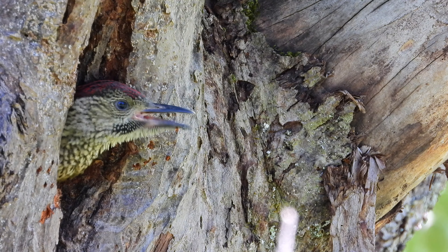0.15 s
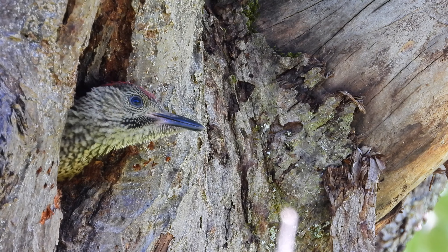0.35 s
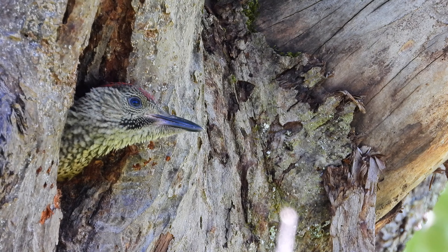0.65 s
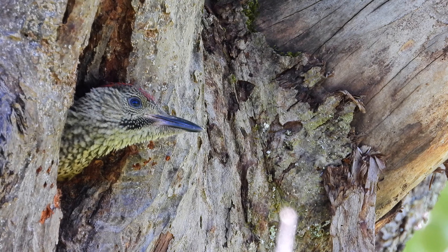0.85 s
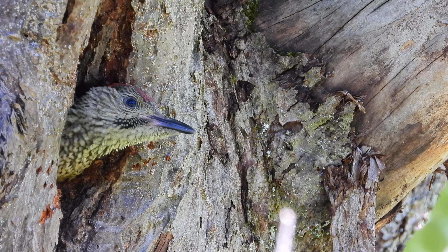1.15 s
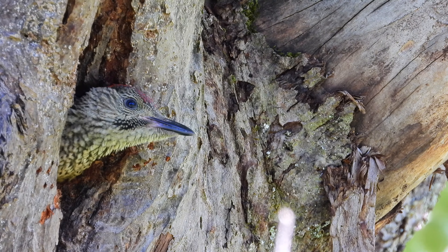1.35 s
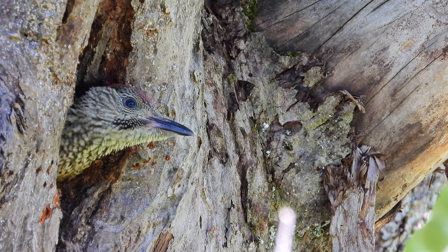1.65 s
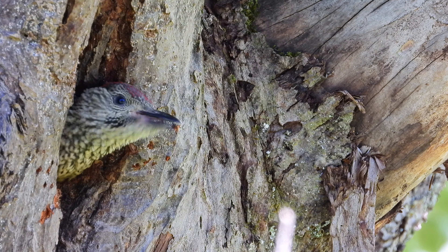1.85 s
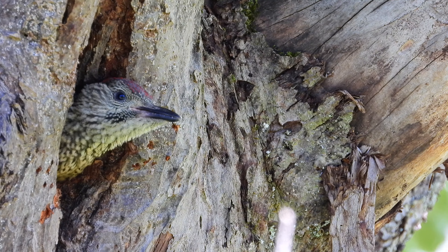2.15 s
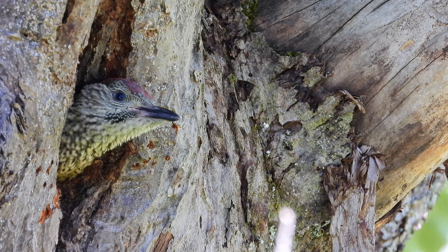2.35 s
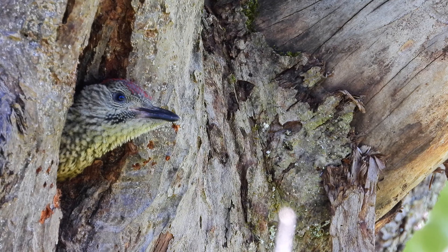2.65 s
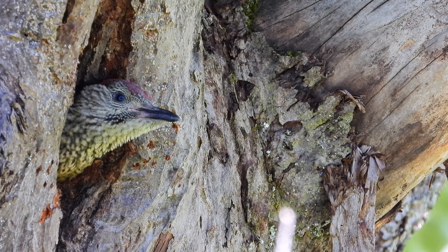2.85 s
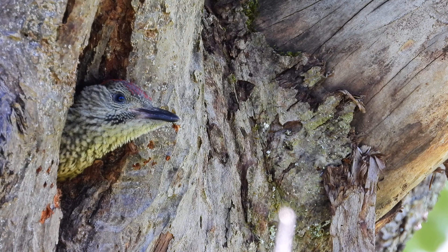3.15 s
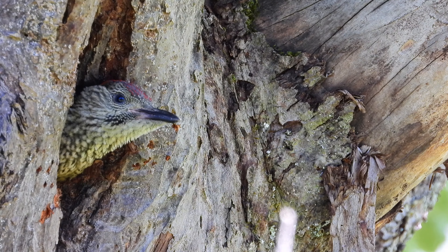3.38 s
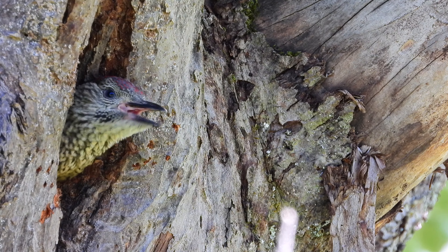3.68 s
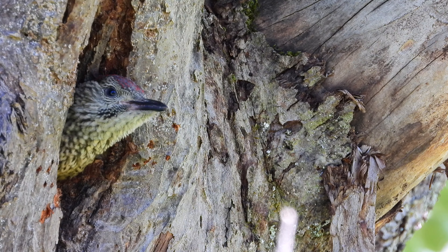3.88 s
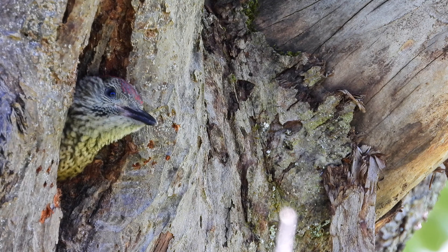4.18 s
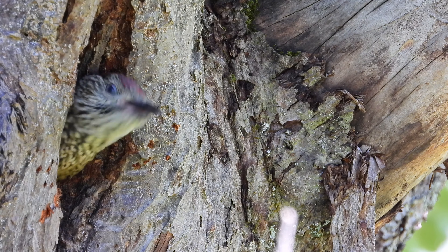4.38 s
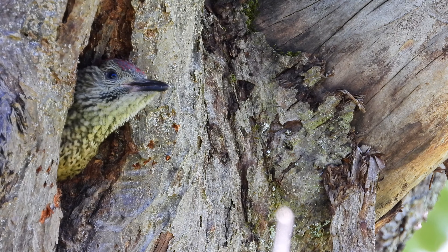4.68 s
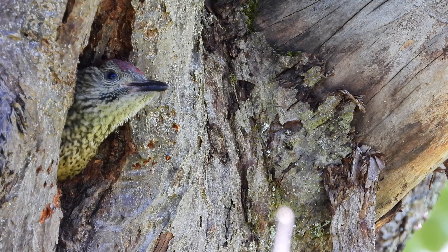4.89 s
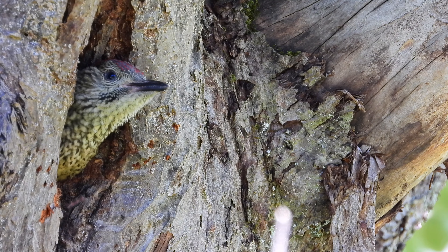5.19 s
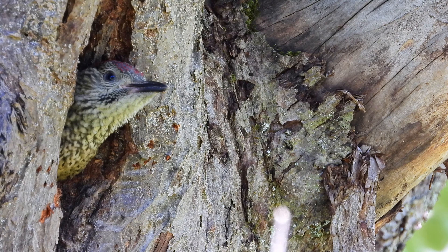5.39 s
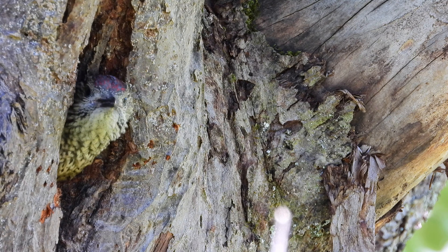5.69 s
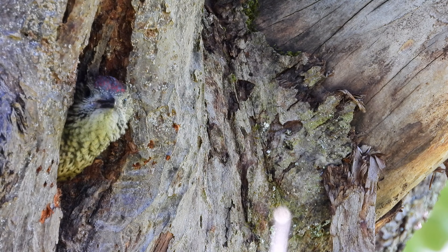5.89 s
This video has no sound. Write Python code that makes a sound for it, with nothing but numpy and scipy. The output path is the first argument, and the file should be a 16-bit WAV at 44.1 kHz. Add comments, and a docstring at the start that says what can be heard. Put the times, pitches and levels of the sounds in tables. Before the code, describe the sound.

A young woodpecker gives four short, sharp, falling calls close by, over faint distant chirps, a soft breeze and hiss.

```python
"""A young woodpecker begs from its nest hole near the microphone: four sharp calls. The membranes of its
syrinx catch roughly, whistle down in pitch and slacken into a rasp; the trunk throws each call back.
Claws scrape on the bark close by, and small birds chirp far off in a softly rushing wood.
The microphone feeds only the right channel, with the camera's faint flutter and hum; both channels hiss."""
import sys
import numpy as np
from scipy import signal
from scipy.fft import rfft, irfft, next_fast_len
from scipy.io import wavfile
from scipy.ndimage import uniform_filter1d, map_coordinates

SR = 44100
rng = np.random.default_rng(int(sys.argv[2]) if len(sys.argv) > 2 else 0)


def store_wav(level_fs):
    """Save 16-bit WAV to argv[1]."""
    pcm = np.round(np.clip(np.atleast_2d(level_fs), -1, 1) * 32767)
    wavfile.write(sys.argv[1], SR, pcm.T.astype(np.int16))


N = 265923


def amp(db):
    """Decibels to gain."""
    return 10 ** (np.asarray(db) / 20)


def unit(x):
    """Scale to rms 1."""
    return x / np.sqrt(np.mean(x ** 2) + 1e-20)


def ramp(t, length):
    """0 before time 0, rising evenly to 1 over length."""
    return np.clip(t / length, 0, 1)


def along(points, hz):
    """Read (Hz, value) points on a log axis."""
    freqs, values = np.transpose(points)
    return np.interp(np.log(hz + 1), np.log(freqs + 1), values)


def filtered(x, response):
    """Pass x through a complex frequency response."""
    size = x.shape[-1]
    padded = next_fast_len(size + 8192)
    return irfft(rfft(x, padded) * response(np.fft.rfftfreq(padded, 1 / SR)), padded)[..., :size]


def low_cut(x, edge_hz, order=4):
    """Roll off what lies below an edge."""
    return filtered(x, lambda hz: 1 - 1 / (1 + (hz / edge_hz) ** order))


def noise(spectrum, size):
    """Coloured noise of rms 1."""
    return unit(filtered(rng.standard_normal(size), lambda hz: amp(along(spectrum, hz))))


def wobble(rate, size):
    """A smooth random curve with rate knots a second."""
    return map_coordinates(rng.standard_normal(size // 8), [np.arange(size) * rate / SR], mode="wrap")


def add(track, start_s, sound):
    """Mix a sound into a track."""
    part = track[max(round(start_s * SR), 0):][:len(sound)]
    part += sound[:len(part)]


# The amplifier's noise floor. Each row: frequency in Hz, relative density in dB.
HISS_SPECTRUM = [(20, -18), (60, -12), (150, -5.5), (400, -2), (2000, -1), (8000, 0), (15000, -1)]


def amplifier_hiss(level_db=-57.5):
    """The steady hiss of one channel's amplifier."""
    return amp(level_db) * noise(HISS_SPECTRUM, N)


# Modes of the camera body. Each row: frequency in Hz, relative level in dB, t60 in seconds.
BODY_MODES = [(113, -12, 0.023), (174.7, 19.5, 0.078), (222, -2.5, 0.071)]
# The camera's hum. Each row: frequency in Hz, rms level in dB.
HUM_TONES = [(100, -72.5), (175.5, -73.5), (200, -75), (400, -79.5), (9890, -93)]


def camera(flutter_db=-64, taps_per_s=20.084, first_s=0.00501, spread_db=2):
    """Right at the microphone, a mechanism softly taps the camera body over a steady hum."""
    t = np.arange(N) / SR
    age = t[:SR // 8]
    tap = sum(amp(db - 60 * age / t60) * np.sin(2 * np.pi * hz * age) for hz, db, t60 in BODY_MODES)
    taps = np.zeros(N)
    for start in np.arange(first_s, N / SR, 1 / taps_per_s):
        add(taps, start, -amp(spread_db * rng.standard_normal()) * tap)
    hum = sum(amp(db) * np.sqrt(2) * np.sin(2 * np.pi * hz * t + 1.2 * wobble(3.12, N))
              for hz, db in HUM_TONES)
    return amp(flutter_db) * unit(low_cut(taps, edge_hz=85)) + hum


# Distant leaves. Each row: frequency in Hz, relative density in dB.
LEAF_SPECTRUM = [(25, -38), (50, -20), (75, -6.5), (110, -3.5), (250, -2.5), (400, -6.5), (600, -1),
                 (850, 0), (1300, -1.5), (1900, -5), (2700, -13.5), (5000, -18), (12000, -23.5)]
# The breeze rising and easing. Each row: time in seconds, level in dB before the lift.
BREEZE_SWELLS = [(0.0, -64.5), (0.34, -61.5), (0.62, -64.5), (3.86, -64.5), (4.6, -61), (6.03, -65)]


def breeze(lift_db=7, patchy_db=2.5):
    """The far rush of the wood, drifting in soft patches."""
    bands = signal.stft(noise(LEAF_SPECTRUM, N), nperseg=1024)[2]
    patches = uniform_filter1d(rng.standard_normal(bands.shape), 5, axis=0)
    patches = uniform_filter1d(patches, 8, axis=1)
    rush = signal.istft(bands * amp(patchy_db * unit(patches)), nperseg=1024)[1][:N]
    swell_db = np.interp(np.arange(N) / SR, *np.transpose(BREEZE_SWELLS))
    return unit(rush) * amp(lift_db + swell_db)


# Decay among the trees. Each row: frequency in Hz, t60 in seconds.
WOOD_DECAY = [(300, 0.12), (2000, 0.25), (9000, 0.079)]


def trees(x):
    """The diffuse echo of the wood around the microphone."""
    hz, t, bands = signal.stft(rng.standard_normal(SR // 2), SR, nperseg=256)
    decay = amp(-60 * t / along(WOOD_DECAY, hz)[:, None])
    tail = signal.istft(bands * decay, SR, nperseg=256)[1]
    return signal.fftconvolve(x, tail / np.linalg.norm(tail))[:N]


# Birds deep in the wood. Each row: midpoint in seconds, length in seconds, pitch in Hz, level in dB.
FAR_CHIRPS = [(1.109, .05, 3470, -61), (2.393, .04, 3570, -62), (3.383, 0.045, 3520, -58),
              (3.43, .04, 3570, -58), (5.757, 0.044, 2217, -56.5)]


def far_birds(slide=0.042, waver=0.045):
    """Thin, wavering chirps from far off, each falling slightly."""
    track = np.zeros(N)
    for middle, length, hz, db in FAR_CHIRPS:
        size = int(length * SR)
        pitch = hz * (1 + slide * np.linspace(.5, -.5, size) + waver * wobble(484, size))
        tone = np.sqrt(2) * np.sin(2 * np.pi * np.cumsum(pitch) / SR)
        add(track, middle - length / 2, amp(db) * np.hanning(size) * tone)
    return track


# Scratched bark. Each row: frequency in Hz, relative density in dB.
BARK_SPECTRUM = [(300, -9), (1400, 2), (2600, -2), (5000, -21), (12000, -22)]
# Claws at the nest. Each row: midpoint in seconds, length in seconds, level in dB.
CLAW_SCRAPES = [(0.074, 0.057, -51), (0.759, 0.033, -53), (0.902, .025, -55), (2.484, 0.026, -53)]


def claws(grit_db=1.6):
    """Short gritty scrapes close by as the bird shifts its grip."""
    track = np.zeros(N)
    for middle, length, db in CLAW_SCRAPES:
        size = int(length * SR)
        grit = unit(noise(BARK_SPECTRUM, size) * amp(grit_db * wobble(430, size)))
        add(track, middle - length / 2, amp(db) * np.hanning(size) * grit)
    return track


# Scatter off the bark around the hole. Each row: frequency in Hz, relative level in dB.
BARK_SCATTER = [(500, -7), (1700, 2), (2300, 3), (3000, -11), (4500, 3), (7000, 5), (14000, -0.5)]


def trunk(x, delay_s=.0035, share=0.57, dull_hz=5000, smear_db=-7.5, t60_s=0.13, gap_s=0.0033):
    """A close reflection off the trunk beats against the sliding pitch; rough bark adds a short smear."""
    t = np.arange(SR // 8) / SR
    tail = noise(BARK_SCATTER, len(t)) * amp(-60 * t / t60_s) * (t > gap_s)
    smear = signal.fftconvolve(x, tail / np.linalg.norm(tail))[:len(x)]
    bounce = filtered(x, lambda hz: np.exp(-2j * np.pi * hz * delay_s) / (1 + (hz / dull_hz) ** 2))
    return x + share * bounce + amp(smear_db) * smear


def chip(t, centre_hz=2805, fall_hz_per_s=45000, early_s=0.00302, width_s=0.0015):
    """The hard, falling blip above the top pitch as the membranes snap into vibration."""
    age = t + early_s
    phase = 2 * np.pi * np.cumsum(centre_hz - fall_hz_per_s * age) / SR
    return np.sqrt(2) * np.exp(-(age / width_s) ** 2) * np.sin(phase)


def pressure_db(t, fall, peak_share=0.47, peak_db=2.5, held_db=-11.5, swell_db_per_s=238, ease_s=0.02):
    """Air pressure swells the tone to a peak part-way down the fall, then eases to a held level."""
    past_peak = t - peak_share * fall
    eased = 1 - np.exp(-(np.maximum(past_peak, 0) / ease_s) ** 2)
    return peak_db + swell_db_per_s * np.minimum(past_peak, 0) + (held_db - peak_db) * eased


# Harmonics at the syrinx, fundamental first. Each entry: relative level in dB.
SYRINX_HARMONICS = [0.5, -2.5, -10.5, -8.5, -16, -14]
# Resonance of the throat and open beak. Each row: frequency in Hz, gain in dB.
THROAT_RESPONSE = [(500, -24), (850, -0.5), (1250, -1), (1700, -2.5), (2050, -3), (2400, -6.5), (3300, -15),
                   (4000, -18), (4700, -6.5), (5300, -4.5), (6100, -5.5), (7600, -7.5), (8400, -26),
                   (11000, -18), (14000, -21)]


def syrinx(smooth_hz, slackness, octave_db, taut_rough=.1, slack_rough=0.904, jitter=.18, shimmer_db=5):
    """Membranes sound through the throat; the slacker they are, the more pitch and strength flutter."""
    size, flutter_rate = len(smooth_hz), 900
    rough = taut_rough + (slack_rough - taut_rough) * slackness
    pitch = smooth_hz * np.exp(jitter * rough ** 1.335 * wobble(flutter_rate, size))
    phase = 2 * np.pi * np.cumsum(pitch) / SR
    tone = np.zeros(size)
    for k, db in enumerate(SYRINX_HARMONICS, 1):
        level_db = db + along(THROAT_RESPONSE, k * pitch) + octave_db * (k == 2)
        tone += amp(level_db + shimmer_db * rough * wobble(flutter_rate, size)) * np.sin(k * phase)
    return tone


def lead_in_db(since_catch, lead_in_db_per_s=480, step_db=7.5, step_s=0.0015):
    """A faint haze of noise swells just before the call, then the voice steps in."""
    return lead_in_db_per_s * np.minimum(since_catch, 0) - step_db * ramp(-since_catch, step_s)


def beak(voice, since_end, close_t60_s=0.077):
    """The small beak radiates little bass and closes as the call ends."""
    closing_db = -60 * np.maximum(since_end, 0) / close_t60_s
    return low_cut(voice * amp(closing_db), edge_hz=640, order=6)


# Air rushing through the throat. Each row: frequency in Hz, relative density in dB.
BREATH_SPECTRUM = [(300, -16.5), (900, 0.5), (1600, 2), (2300, 5.5), (3200, 3), (4500, 7), (5200, -2),
                   (6200, 3), (7700, -5.5), (8500, -4), (11500, -11.5), (15000, -18)]


def breath(loose, slide, broken, air_db=-12.5, leak_db=4.5, fade_db=10.5):
    """Air bursts out as the membranes catch, fades as the note settles and partly returns at the break."""
    level_db = air_db + leak_db * loose - fade_db * slide * (1 - broken / 2)
    return amp(level_db) * noise(BREATH_SPECTRUM, len(loose))


def call(t, fall, hold, drop, top_hz, held_hz, octave_db, rasp_db,
         catch_s=.007, catch_db=15, break_s=0.0044, sag_octaves_per_s=0.805, release_db=8.5):
    """The syrinx jumps up to a whistle at t = 0, slides down, holds, then breaks into a rough croak."""
    since_break = t - fall - hold
    loose = ramp(-t, catch_s)  # 1 until the membranes start to catch, 0 from the top pitch on
    broken, dropped = ramp(since_break, break_s), ramp(since_break, drop)
    slide = (1 - np.cos(np.pi * ramp(t, fall))) / 2
    sag = sag_octaves_per_s * np.clip(t - fall, 0, hold)
    octaves_down = loose + sag + .3 * broken + 0.8 * dropped
    pitch = (top_hz + slide * (held_hz - top_hz)) * 2 ** -octaves_down
    tone_db = pressure_db(t, fall) - catch_db * loose
    tone = np.sqrt(2) * amp(tone_db) * syrinx(pitch, loose + broken, octave_db)
    voice = (tone + amp(rasp_db) * breath(loose, slide, broken)) * amp(lead_in_db(t + catch_s))
    release = amp(-release_db * dropped ** 2)  # the pressure lets go as the pitch drops
    return beak(voice * release, since_break - drop)


# Calls from the nest hole. Each row: time of the top pitch, then lengths of fall, hold and drop, all in
# seconds, top and held pitch in Hz, then gains in dB for the whole call, second harmonic, rasp and chip.
BEGGING_CALLS = [(0.367, 0.041, 0.01, .028, 2326, 1612, -28, -6, -2, -13),
                 (2.084, 0.052, .005, 0.028, 2380, 1700, -29, 2, 0.5, -4),
                 (3.892, .046, 0.00281, 0.018, 2338, 1645, -31, 4.5, 2.5, -3.5),
                 (4.564, 0.045, .044, .035, 2325, 1735, -25, 1, -5.5, -7)]


def woodpecker(lead_s=.034):
    """The young bird near the microphone: each call is led by its chip and thrown back by the trunk."""
    track = np.zeros(N)
    t = np.arange(SR // 4) / SR - lead_s
    for top_s, fall, hold, drop, top_hz, held_hz, db, octave_db, rasp_db, chip_db in BEGGING_CALLS:
        voice = call(t, fall, hold, drop, top_hz, held_hz, octave_db, rasp_db)
        add(track, top_s - lead_s, amp(db) * trunk(voice + amp(chip_db) * chip(t)))
    return track


def scene(near_echo_db=-20, far_echo_db=-5):
    """One microphone by the nest tree feeds the right channel; the left carries only amplifier hiss."""
    near, far = woodpecker() + claws(), far_birds()
    echo = trees(amp(near_echo_db) * near + amp(far_echo_db) * far)
    microphone = near + far + echo + breeze() + camera()
    return np.array([amplifier_hiss(), microphone + amplifier_hiss()])


def record(dry):
    """The recorder keeps nothing above its band limit."""
    return filtered(dry, lambda hz: hz < 15750)


dry = scene()
out = record(dry)
store_wav(out)
```